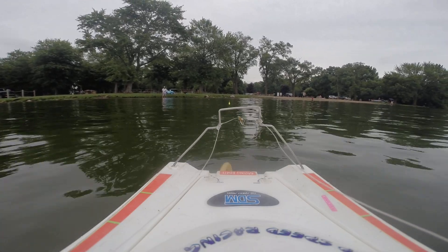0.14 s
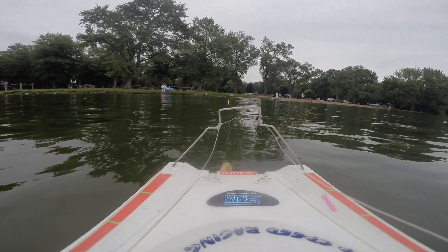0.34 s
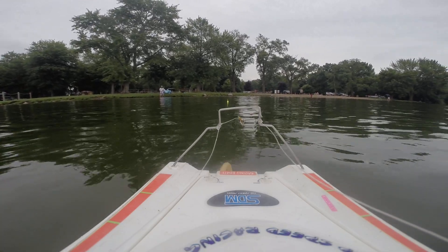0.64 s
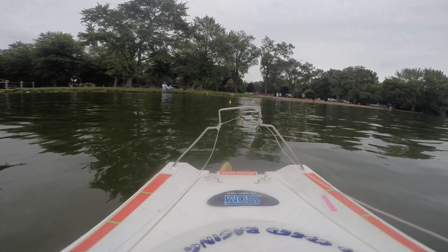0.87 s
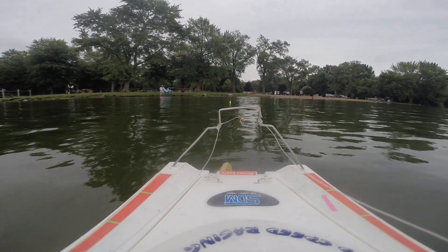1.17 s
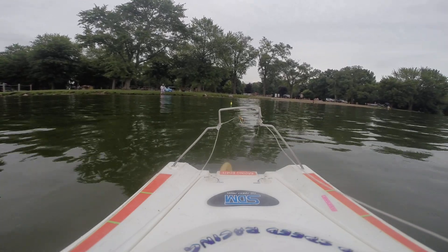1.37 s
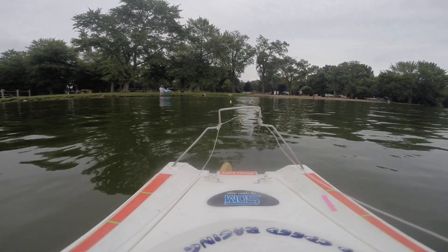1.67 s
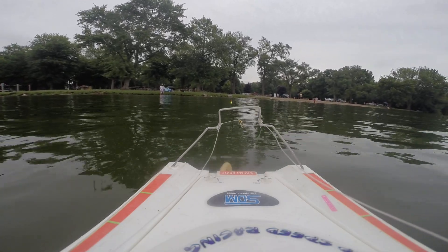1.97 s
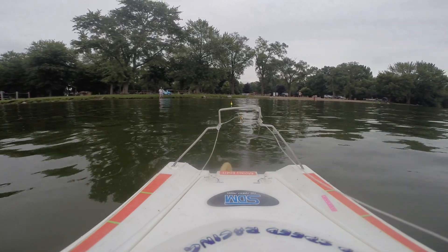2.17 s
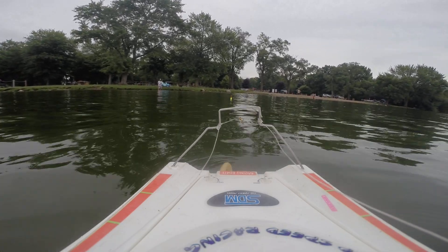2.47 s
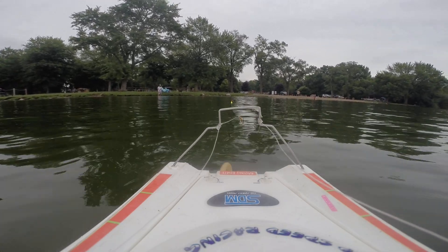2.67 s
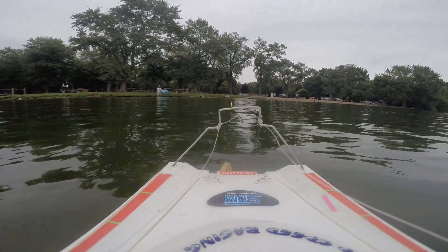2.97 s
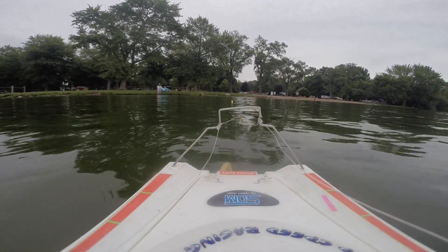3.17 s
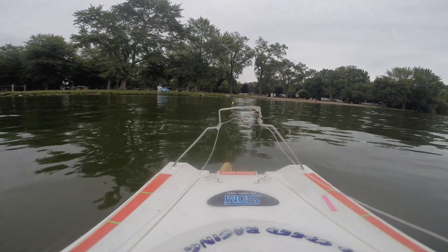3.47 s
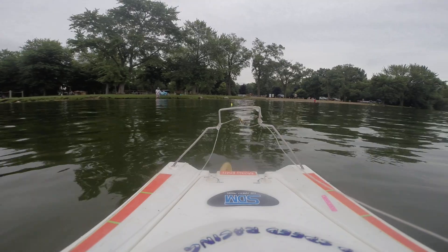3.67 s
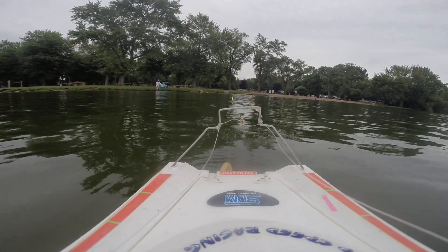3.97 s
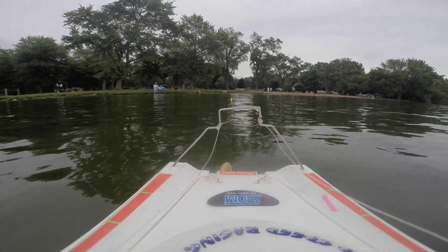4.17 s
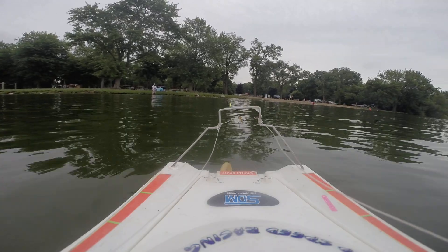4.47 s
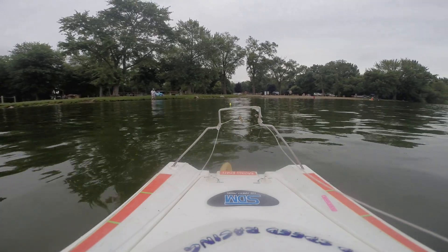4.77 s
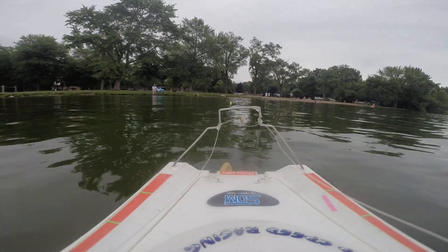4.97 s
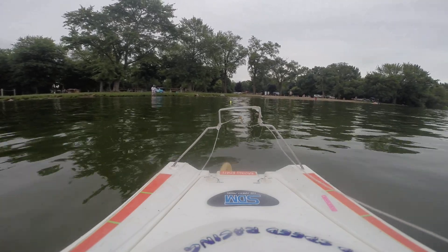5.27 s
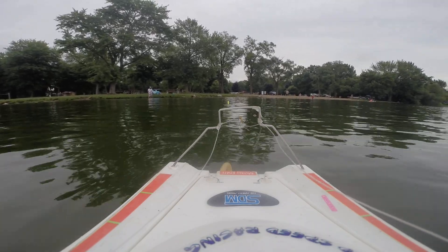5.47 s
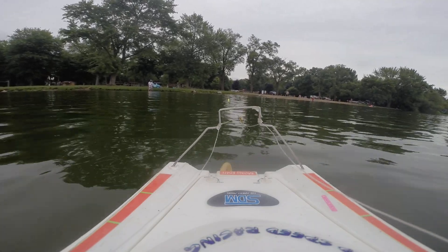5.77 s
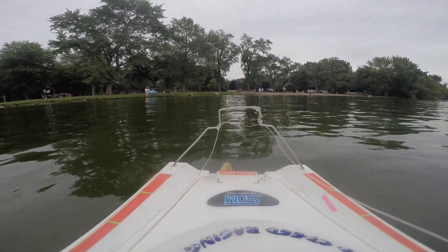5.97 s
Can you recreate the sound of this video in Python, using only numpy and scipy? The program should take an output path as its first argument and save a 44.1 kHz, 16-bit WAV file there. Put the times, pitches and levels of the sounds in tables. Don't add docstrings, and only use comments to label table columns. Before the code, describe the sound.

A dry, nasal mechanical buzz, roughly forty-five knocks a second, dominates close up, its tone shifting gently as ripples tilt the hollow deck. Behind it are dull low thuds, soft sloshing, background hiss, thin very high whines and brief early insect scrapes. Water slaps grow clearer around four seconds. Near the end the buzz stops abruptly and quiet lapping outdoors is exposed.

```python
import sys
import numpy as np
from scipy import signal
from scipy.fft import rfft, irfft
from scipy.io import wavfile
from scipy.ndimage import uniform_filter1d

SR = 44100
rng = np.random.default_rng(int(sys.argv[2]) if len(sys.argv) > 2 else 0)


def unload_audio(sound):
    columns = np.transpose(np.atleast_2d(sound))
    steps = np.round(np.clip(columns, -1, 1) * 32767)
    wavfile.write(sys.argv[1], SR, steps.astype(np.int16))


def nominal_scale(level):
    x = np.asarray(level, float) / 20
    return 10 ** x


N = 269892
T = np.arange(N) / SR

# (frequency [Hz], width [Hz], peak level [dB], arrival delay [ms])
HULL_MODES = [(923, 74, -63.6, 2.07), (1091, 302, -52.9, 1.357), (1207, 136, -63.6, 1.135),
              (1394, 64, -66.5, 1.887), (1554, 179, -51.3, 1.786), (1575, 98, -47.5, 1.268),
              (1647, 144, -48.0, 1.333), (1845, 43, -62.6, 1.561), (2101, 118, -50.3, 1.631),
              (2199, 83, -54.8, 1.326), (2327, 88, -54.4, 1.446), (2502, 128, -45.1, 1.506),
              (2894, 131, -48.3, 1.498)]
# (per roll [Hz], per roll [dB], per pitch [Hz], per pitch [dB])
HULL_SHIFTS = [(-1, -1.3, 1, .1), (0, .1, 12, .9), (4, -.2, 0, 1.3), (-4, -.7, 4, -.9), (-8, .5, 17, -.9),
               (2, -.6, -4, -1.5), (-6, -1, -6, 2.4), (0, .1, 0, -.2), (2, -.4, 1, .1), (-1, .9, 3, -.2),
               (5, .2, 2, -1.1), (4, .8, 1, .2), (4, -.4, -2, .3)]
# (frequency [Hz], width [Hz], peak level [dB], arrival delay [ms])
CASE_MODES = [(3075, 134, -54.3, 1.465), (3280, 151, -54.6, 1.55), (3609, 119, -55.6, 1.432),
              (3812, 188, -47.9, 1.578), (4162, 146, -55.2, 1.504), (4495, 195, -56.2, 1.581),
              (4870, 308, -57.1, 1.551), (5617, 188, -62.8, 1.854), (5495, 229, -56.9, 1.66),
              (6098, 280, -61.9, 1.65), (6729, 421, -52.9, 1.51), (6824, 360, -55.0, 1.443),
              (7562, 364, -67.8, 1.547), (8265, 679, -70.9, 1.666)]
# (per roll [Hz], per roll [dB], per pitch [Hz], per pitch [dB])
CASE_SHIFT = (-5, .3, 1.5, -.1)
# (frequency [Hz], width [Hz], peak level [dB],
# arrival delay [ms], per roll [Hz], per roll [dB], per pitch [Hz], per pitch [dB], share of a roll back [ratio])
WATERLINE_PANEL = (2634, 95, -66.5, 1, 7, 7.5, -1.5, 0.5, 0.37)
KEEL_PANEL = (2770, 87, -56.5, 1.4, -3, 4.2, 6, .5, -0.5)
SNAP_PULSES = [1, 3, 7, 9, 15, 101, 105, 107, 137, 141]
# (crest time [s], height [relative], fall after it [relative])
ROLLS = [(-.3, .3, .6), (.19, .4, .45), (.77, 1.4, 1.7), (1.22, 1.24, 1.1), (1.76, 0.58, 0.84),
         (2.33, 1.3, .85), (2.8, 0.9, .4), (3.41, 1.25, 1.4), (3.8, 1.6, 1.2), (4.32, 1.33, 0.88),
         (4.93, 1.2, 1.1), (5.53, 1.3, 1.0), (6.1, 1.0, 1.0)]
# (time [s], pitch [relative])
NODS = [(.12, -0.8), (.4, 0.2), (.66, -1), (.98, 1.2), (1.2, 1), (1.33, -.5), (1.55, 0.4), (1.8, -1.3),
        (2.26, 1.75), (2.54, -1.55), (2.88, 1.1), (3.36, -1.5), (3.55, 1.2), (3.87, 1.5), (4.17, -0.8),
        (4.45, 0.7), (4.8, -1.5), (4.96, 1.5), (5.19, 1.7), (5.46, -1.65)]
# (frequency [Hz], width [Hz], level [dB])
LAP_RINGS = [(1690, 80, -4), (1820, 70, -2.5), (2050, 90, -6.5), (2280, 60, -3.5), (2720, 60, -12),
             (3600, 250, -14)]
# (time [s], peak level [dB], half length [s], frequency of the part struck [Hz])
SLOSHES = [
    (.2, -67, .3, 2400),
    (1.14, -68, .09, 2300),
    (1.58, -69, .2, 2400),
    (3.38, -63, .2, 2400),
    (3.7, -63, .08, 2200),
    (3.98, -55, 0.04, 2250),
    (4.28, -59, 0.055, 2100),
    (5.737, -61, .05, 1750),
    (5.89, -61, 0.066, 1850),
    (6.1, -58, .07, 2030),
]
# (frequency [Hz], width [Hz], level [dB])
THUDS = [(42.2, 11, -61.5), (113, 26.4, -61)]
# (frequency [Hz], density [dB per Hz])
HISS_SPECTRUM = [(12, -48), (20, -20), (70, -7), (118, -3.5), (168, -6.5), (350, -11), (600, -14.5),
                 (1000, -17.5), (1500, -18.5), (2500, -22), (5000, -28), (8000, -35), (12500, -40.5),
                 (15000, -49)]
# (frequency [Hz], level [dB rms])
WHINES = [(5852, -88), (8781, -85), (11718, -87), (14625, -81)]
# (start time [s], peak level [dB])
RASPS = [(0.0443, -62), (0.2114, -62), (0.2698, -63), (0.4324, -62), (0.5312, -62), (0.6973, -62),
         (0.8335, -65), (0.9877, -63), (1.0994, -63), (1.2645, -64), (1.3997, -63), (1.5105, -63),
         (1.6656, -63), (1.8322, -62), (1.9934, -62), (2.0707, -63), (2.2328, -63), (2.4099, -63)]
# (frequency [Hz], width [Hz], level [dB])
WINGS = [(10570, 1500, 1), (12800, 1300, -2)]
# (low edge [Hz], high edge [Hz])
THIN_BANDS = [(12900, 13350), (13350, 13800), (13800, 14300)]


def level(x, db):
    return x * nominal_scale(db) / np.sqrt(np.mean(x ** 2))


def ring(x, hz, width):
    return signal.lfilter(*signal.iirpeak(hz, hz / width, SR), x)


def walk(rate, size):
    hold = int(SR / rate)
    steps = rng.standard_normal((size, N // hold + 1))
    held = np.repeat(steps, hold, axis=1)[:, :N]
    return 1.3 * uniform_filter1d(uniform_filter1d(held, hold), hold)


def bump(t, centre, half_width):
    return np.exp(-.5 * ((t - centre) / half_width) ** 2)


def rocking(t):
    crest_s, height, fall = np.transpose(ROLLS)
    turn = np.interp(t, crest_s, np.arange(len(crest_s)))
    swing = np.cos(2 * np.pi * turn)
    nearest, previous = np.round(turn).astype(int), turn.astype(int)
    roll = swing * np.where(swing > 0, height[nearest], fall[previous])
    nod_s = 0.078
    pitch = sum(size * bump(t, at, nod_s) for at, size in NODS)
    return roll, pitch


def lapping(struck_hz):
    calm_db, reach_hz = -74, 600
    loudness = nominal_scale(calm_db)
    for s, db, half_s, slosh_hz in SLOSHES:
        loudness = loudness + nominal_scale(db) * bump(T, s, half_s) * bump(struck_hz, slosh_hz, reach_hz)
    return loudness


def water():
    flicker_db = 1.5 * walk(14, size=len(LAP_RINGS))
    drop_db = np.minimum(2.5 * rng.exponential(size=N), 14)
    drops = rng.standard_normal(N) * nominal_scale(drop_db)
    out = np.zeros(N)
    for (hz, width, db), flicker in zip(LAP_RINGS, flicker_db):
        tone = level(ring(ring(drops, hz, width), hz, 3 * width), -2.4)
        out += lapping(hz) * nominal_scale(db + flicker) * tone
    for hz, width, db in THUDS:
        out += level(ring(rng.standard_normal(N), hz, width), db)
    return out


def background():
    hz, db = np.transpose(HISS_SPECTRUM)
    bins = np.maximum(np.arange(N // 2 + 1) * SR / N, 1)
    shape = nominal_scale(np.interp(np.log(bins), np.log(hz), db))
    hiss = irfft(rfft(rng.standard_normal(N)) * shape, N)
    flutter = 1 + 0.13 * walk(148, size=1)[0]
    whines = sum(np.sqrt(2) * nominal_scale(db) * np.sin(2 * np.pi * f * T) for f, db in WHINES)
    return level(hiss, -56) + whines * flutter


def picture_comb():
    hz, db = WHINES[-1]
    picture_hz, skirt_hz, skirt_db = 30, 450, -88
    lines = np.zeros(N)
    for k in range(-6, 9):
        if k == 0:
            continue
        side_db = db - 11 - 4 * (abs(k) - 1) - 5 * (k < 0)
        turns = (hz + k * picture_hz) * T + rng.random()
        lines += np.sqrt(2) * nominal_scale(side_db) * np.sin(2 * np.pi * turns)
    fuzz = ring(ring(rng.standard_normal(N), hz, skirt_hz), hz, skirt_hz)
    return lines + level(fuzz, skirt_db)


def servo():
    pulses, first_tick, pulse_ticks = 253, 104.0, 225.5247
    tick_s = 4.30494 / 44100
    timing, strength = rng.standard_normal((2, pulses))
    start = np.round(first_tick + pulse_ticks * np.arange(pulses)) * tick_s
    start = start + .004 / 1000 * timing
    at = (start * SR).astype(int)
    roll, pitch = rocking(start)
    roll, pitch = 1.45 * roll, 1.4 * pitch

    modes = [mode + shift + (.3,) for mode, shift in zip(HULL_MODES, HULL_SHIFTS)]
    modes += [mode + CASE_SHIFT + (.3,) for mode in CASE_MODES]
    modes += [WATERLINE_PANEL, KEEL_PANEL]
    step = np.arange(1300)
    knocks = np.zeros((pulses, len(step)))
    for hz, width, db, arrive_ms, roll_hz, roll_db, pitch_hz, pitch_db, back in modes:
        freed = np.maximum(roll, back * roll)
        wander = uniform_filter1d(rng.standard_normal((2, pulses)), size=5) * np.sqrt(5)
        now_hz = hz + roll_hz * roll + pitch_hz * pitch + 2.0 * wander[0]
        now_db = db + roll_db * freed + pitch_db * pitch + .4 * wander[1]
        since = (at[:, None] + step) / SR - start[:, None] - arrive_ms / 1000
        since = np.maximum(since, 0)
        fade = np.pi * width * since
        swell = fade * np.exp(1 - fade)
        knocks -= nominal_scale(now_db)[:, None] * swell * np.sin(2 * np.pi * now_hz[:, None] * since)
    knocks *= nominal_scale(0.2 + .2 * strength)[:, None]
    out = np.zeros(N + len(step))
    np.add.at(out, at[:, None] + step, knocks)

    snap_lead_ms, snap_db = 1.12, -5
    struck = knocks[SNAP_PULSES]
    thin = struck - .75 * ring(struck, 1850, 900)
    early = at[SNAP_PULSES] - int(snap_lead_ms / 1000 * SR)
    np.add.at(out, early[:, None] + step, -nominal_scale(snap_db) * thin)
    return out[:N]


def insect():
    rasp_s, teeth_hz = 0.037, 167.4
    teeth = np.zeros(N)
    for s, db in RASPS:
        tooth = np.arange(0, rasp_s * teeth_hz) + .15 * rng.random()
        times = s + tooth / teeth_hz
        teeth[(times * SR).astype(int)] = nominal_scale(db + 1.5 * rng.standard_normal(len(times)))
    scrape = signal.lfilter([1], [1, -.99], teeth)
    scrape = scrape * np.sign(rng.standard_normal(N))
    wings = sum(nominal_scale(db) * ring(ring(scrape, hz, w), hz, w) for hz, w, db in WINGS)
    return nominal_scale(5.5) * wings


def scene():
    return (water() + background() + picture_comb() + servo() + insect())[None, :]


def block_power(x):
    return uniform_filter1d(x ** 2, size=1200)[::512]


def thin_treble(x):
    mask_db, over_db, cut_db = -55, .8, -26
    spectrum = rfft(x)
    bins = np.arange(N // 2 + 1) * SR / N

    def band(lo, hi):
        return irfft(spectrum * ((bins >= lo) & (bins < hi)), N)

    busy = block_power(band(1200, 5000)) > nominal_scale(2 * mask_db)
    out = x.copy()
    for lo, hi in THIN_BANDS:
        part = band(lo, hi)
        power = block_power(part)
        dropped = busy & (power < np.median(power) * nominal_scale(2 * over_db))
        muted = uniform_filter1d(np.repeat(1. * dropped, 512)[:N], size=128)
        out -= (1 - nominal_scale(cut_db)) * part * muted
    return out


def roll_off(x):
    return signal.sosfilt(signal.butter(12, 15270, fs=SR, output="sos"), x)


def record(dry):
    low_pass = signal.ellip(8, .2, 60, 14950, fs=SR, output="sos")
    top_cut = signal.sosfilt(low_pass, dry[0])
    mix = thin_treble(top_cut)[None, :]
    return roll_off(mix)


dry = scene()
out = record(dry)
unload_audio(out)
```